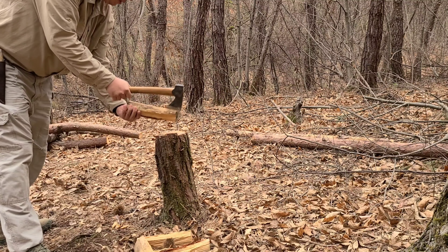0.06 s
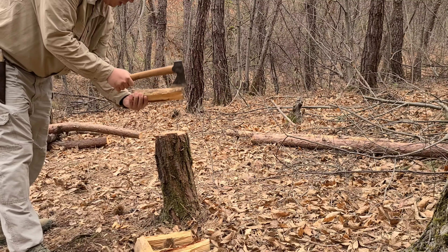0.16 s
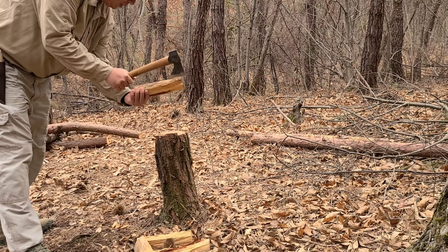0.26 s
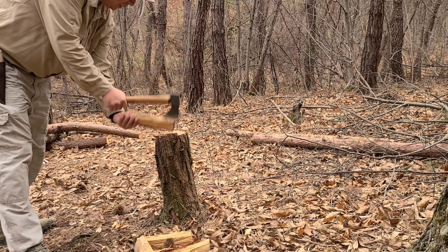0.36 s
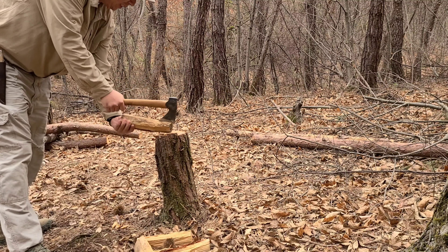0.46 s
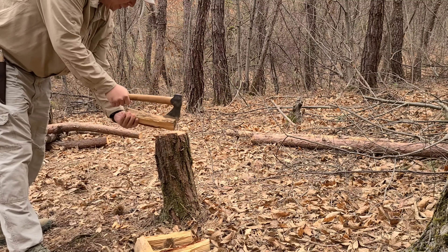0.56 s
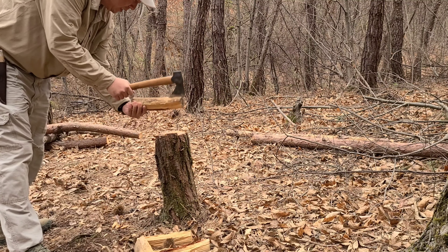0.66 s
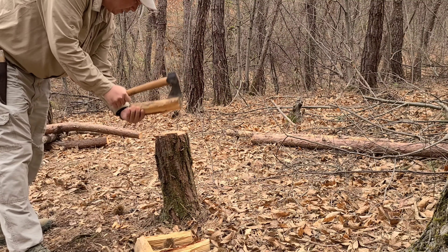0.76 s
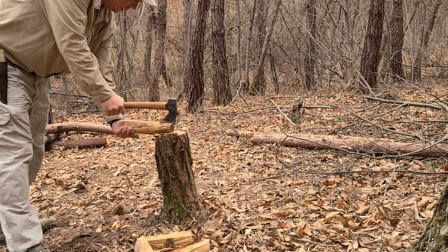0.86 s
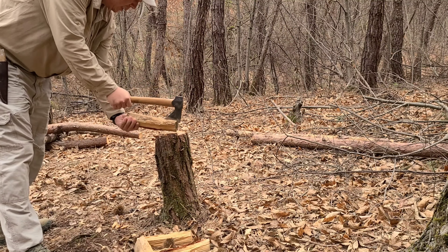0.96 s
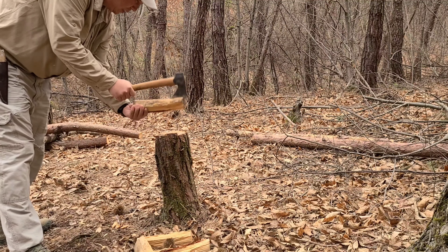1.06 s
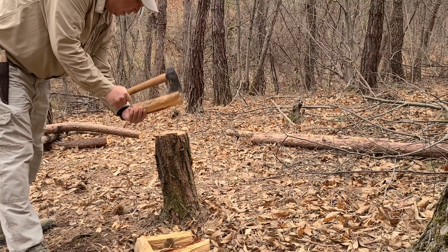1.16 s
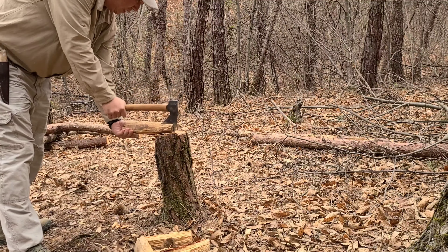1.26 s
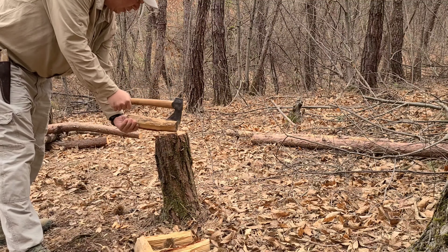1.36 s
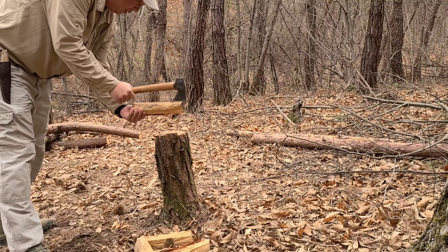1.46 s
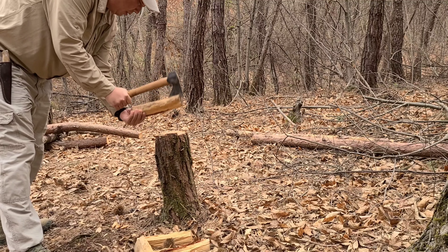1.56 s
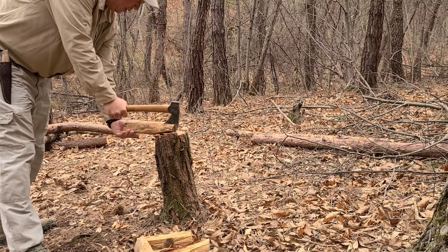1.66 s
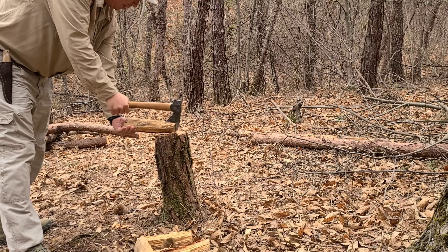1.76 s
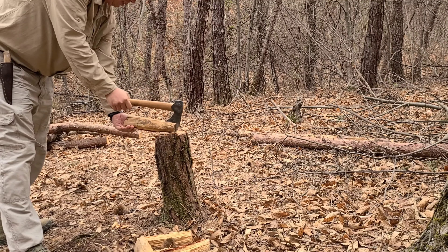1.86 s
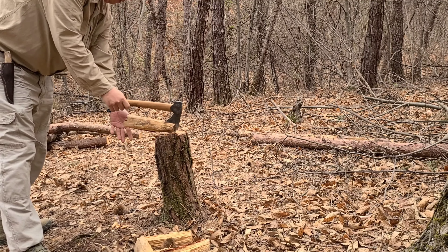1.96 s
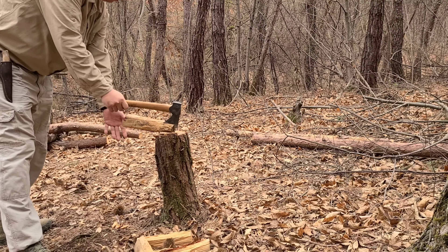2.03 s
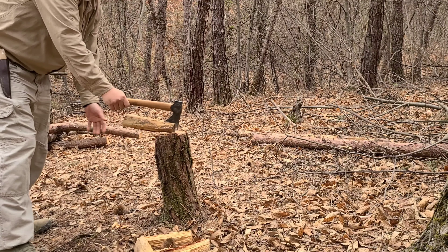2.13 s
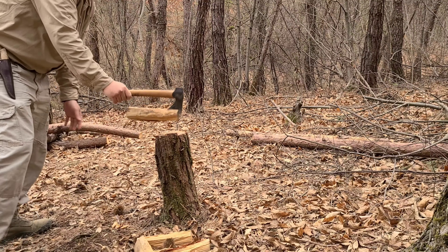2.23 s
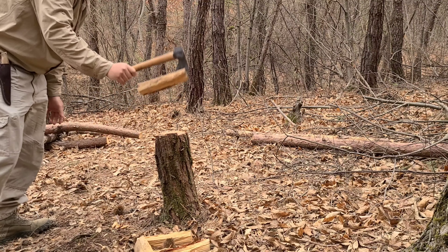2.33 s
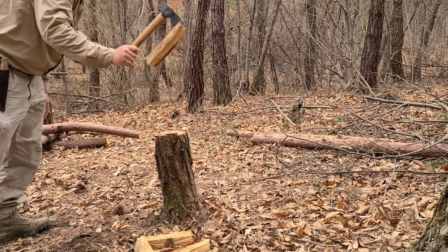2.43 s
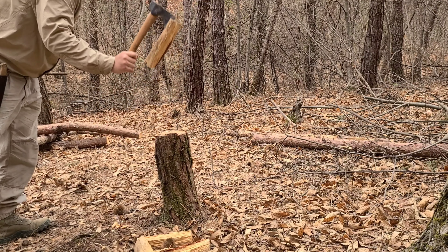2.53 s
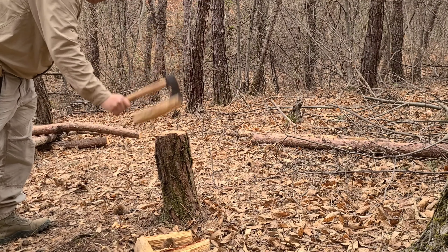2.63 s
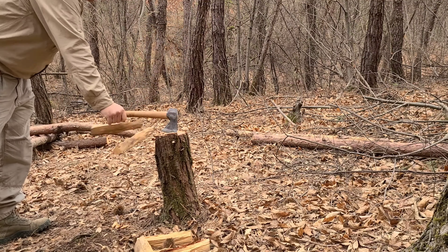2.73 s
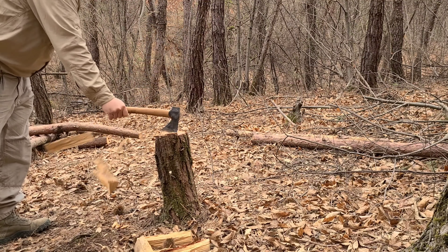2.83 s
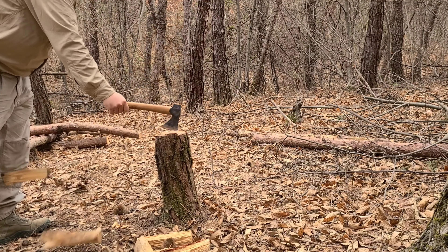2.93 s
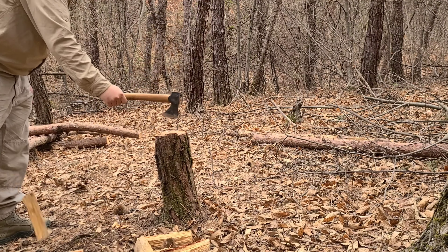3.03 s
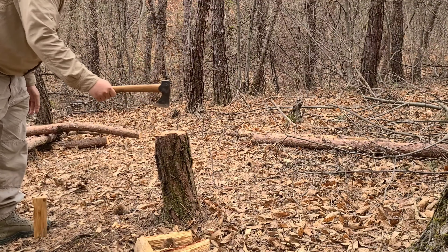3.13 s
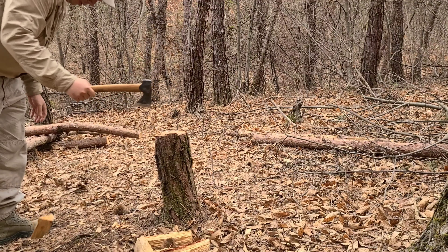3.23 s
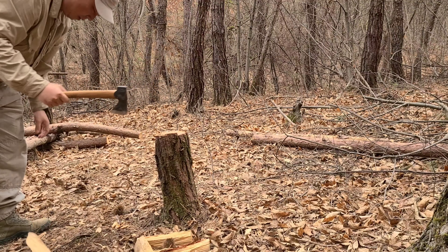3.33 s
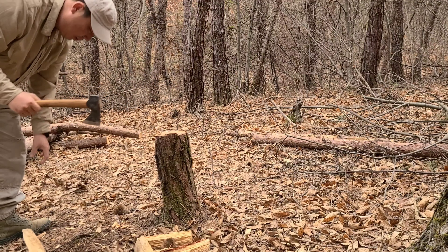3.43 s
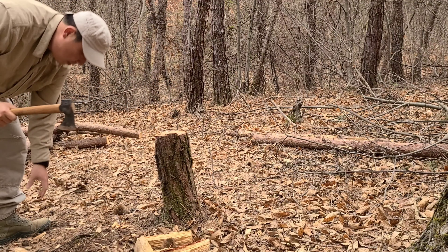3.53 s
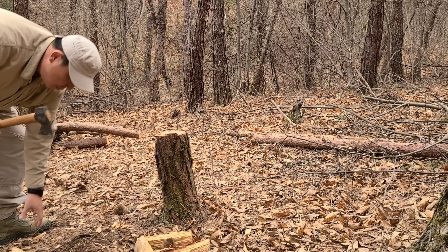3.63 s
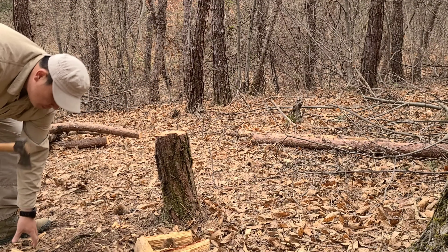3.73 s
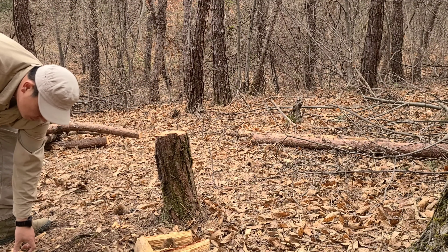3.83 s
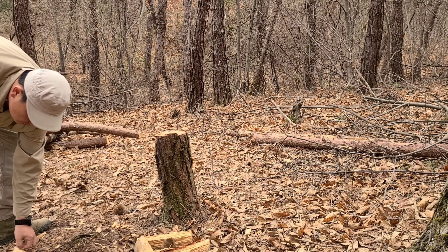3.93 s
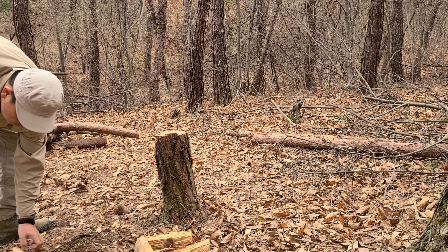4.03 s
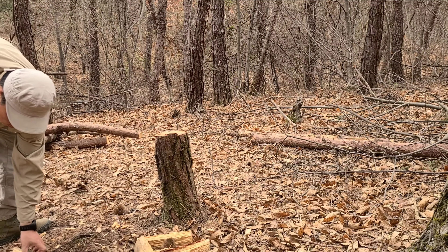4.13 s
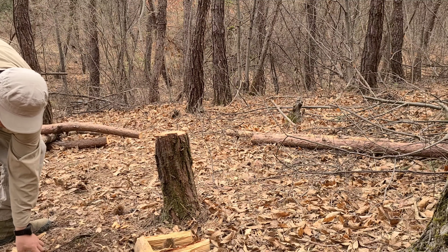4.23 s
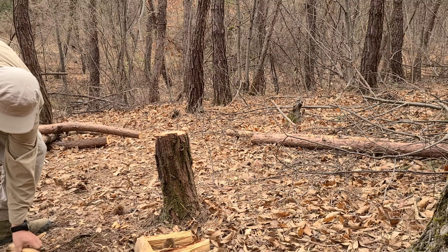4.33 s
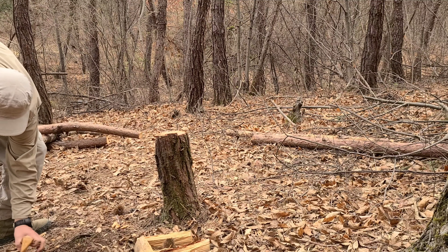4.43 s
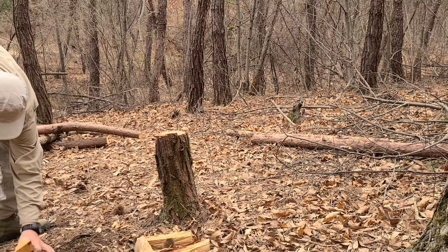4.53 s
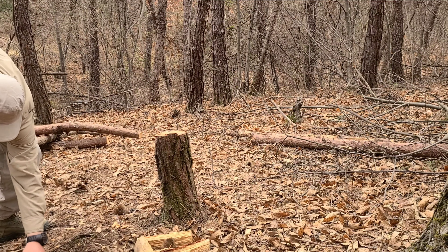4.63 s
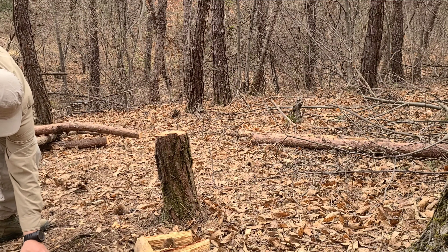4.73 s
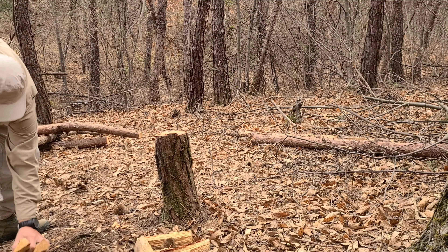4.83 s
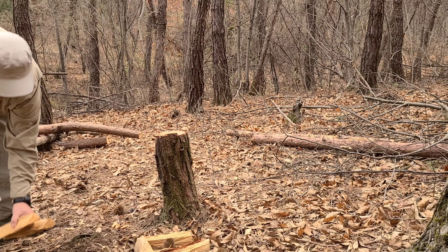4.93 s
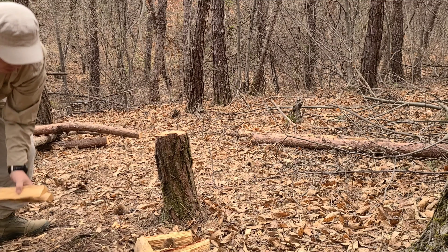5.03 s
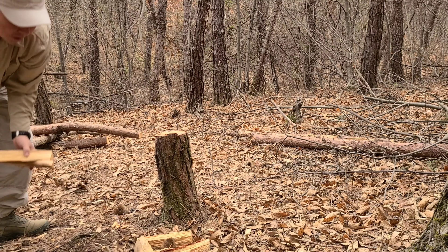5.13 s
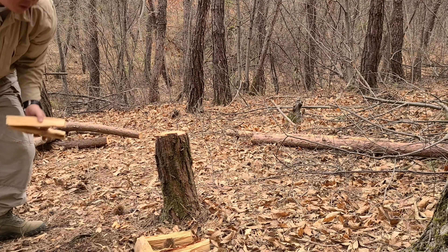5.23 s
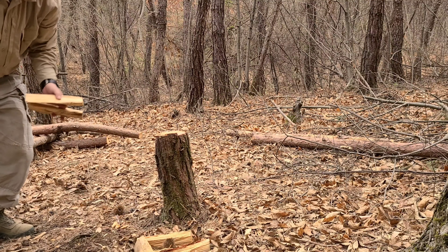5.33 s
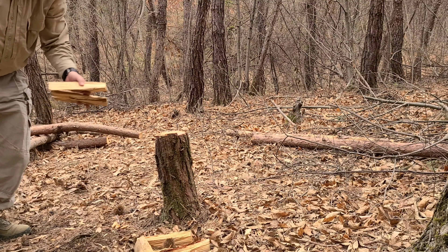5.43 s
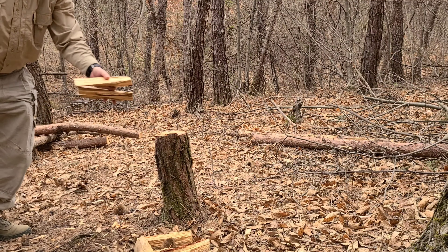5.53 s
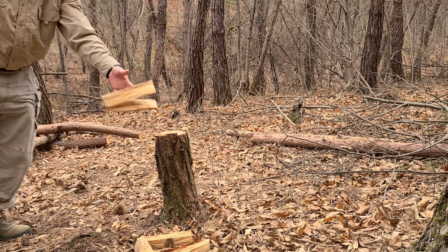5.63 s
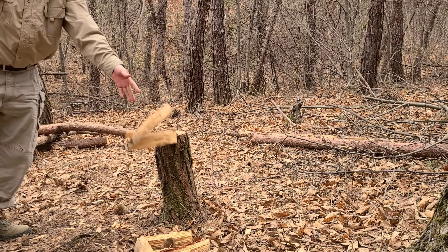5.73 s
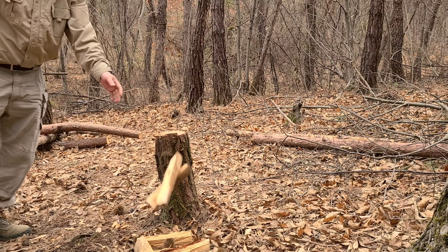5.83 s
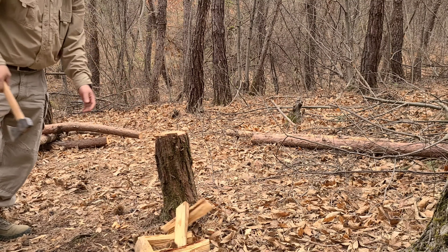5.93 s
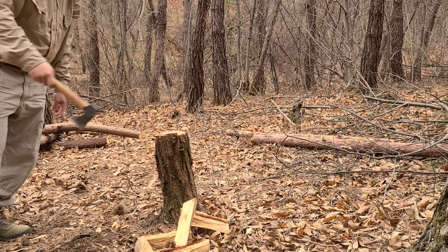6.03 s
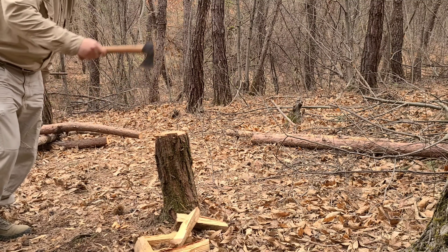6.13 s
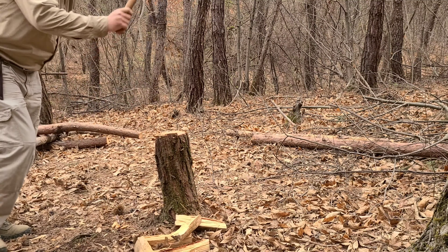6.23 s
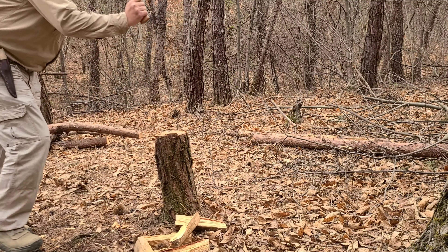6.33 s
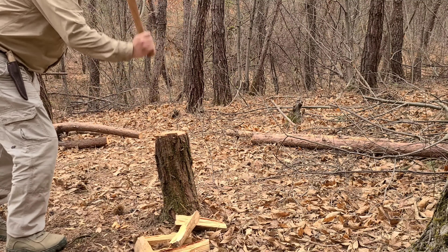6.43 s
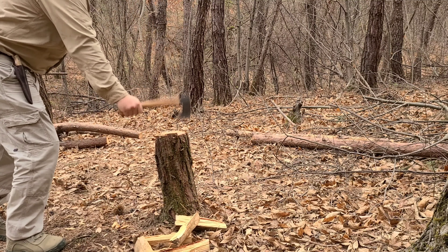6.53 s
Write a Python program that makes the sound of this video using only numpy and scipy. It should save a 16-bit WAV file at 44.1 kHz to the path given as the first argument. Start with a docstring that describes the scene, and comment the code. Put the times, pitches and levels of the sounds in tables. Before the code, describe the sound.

A low rumble and faint hiss lie under a quiet forest throughout. At about 0.6, 1.0, 1.4 and 1.8 seconds, a hatchet with firewood stuck on its blade knocks on a stump, each time with a short woody ring, a crackle of fibres and a dull thud. Leaves scuff softly near 2.3 seconds. At 2.9 seconds the hardest blow splits the wood with a loud crack and a deeper thump. From 3.1 to 3.5 seconds the pieces drop into dry leaves, crunching and knocking, slightly to the left. Until about 5.6 seconds a hand gathers them, with soft rustling, sharp little twig snaps and light wooden clicks. Around 5.9 to 6.2 seconds the pieces are tossed and clatter onto a pile among the leaves, followed by more rustling and small snaps to 6.5 seconds. Knocks and snaps echo briefly among the trees.

```python
"""A low rumble lies under a quiet forest. A hatchet with a piece of firewood stuck on its blade is knocked
four times on a stump: each time the wood rings, its fibres crackle and the ground thuds. Near 2.9 s a
fifth, hard blow splits it, and the pieces drop into dry, brittle leaves. A hand gathers them, rustling
leaves and snapping twigs, and near 6 s tosses them on a pile. Knocks and snaps echo among the trees."""
import sys
import numpy as np
from scipy import signal
from scipy.fft import rfft, irfft, next_fast_len
from scipy.io import wavfile
from scipy.ndimage import uniform_filter1d

SR = 44100
rng = np.random.default_rng(int(sys.argv[2]) if len(sys.argv) > 2 else 0)


def pcm_store(signal):
    """Save signal as 16-bit PCM."""
    levels = np.round(np.clip(np.atleast_2d(signal), -1, 1) * 32767)
    wavfile.write(sys.argv[1], SR, levels.astype(np.int16).T)


N = 290178


def amp(db):
    """Turns decibels into a number to multiply by."""
    return 10 ** (np.asarray(db) / 20)


def unit_rms(x):
    """Scales x so that its average strength (rms) is 1."""
    return x / np.sqrt(np.mean(x ** 2) + 1e-20)


def with_peak(x, db):
    """Scales x so that its peak is at db."""
    return amp(db) * x / abs(x).max()


def curve_at(points, hz):
    """Reads between rows of (Hz, value), with octaves evenly spaced."""
    f, value = np.transpose(points)
    return np.interp(np.log(hz + 1), np.log(f + 1), value)


def coloured(x, spectrum, tilt_db=0):
    """Gives x a tone colour, brighter by tilt_db per octave, at rms 1."""
    size = next_fast_len(x.shape[-1])
    hz = np.fft.rfftfreq(size, 1 / SR)
    gain = amp(curve_at(spectrum, hz) + tilt_db * np.log2(hz / 3000 + 0.039))
    return unit_rms(irfft(rfft(x, size) * gain, size)[..., :x.shape[-1]])


def patchy(x, depth_db):
    """Each leaf has its own pitch: random bands stand out for a moment."""
    spectrum = signal.stft(x, nperseg=256, noverlap=128)[2]
    noise = rng.standard_normal(spectrum.shape[:0:-1])
    patches = unit_rms(uniform_filter1d(uniform_filter1d(noise, 4, 0), 5, 1)).T
    return signal.istft(spectrum * amp(depth_db * patches), nperseg=256, noverlap=128)[1][:, :N]


def envelope(t, rise, t60, hold=0):
    """Swells, holds, then fades; t60 is the seconds it takes to fall by 60 dB."""
    swell = 1 - np.exp(-(t / max(rise, 1e-4)) ** 2)
    shape = swell * amp(-60 * np.maximum(t - hold, 0) / max(t60, 1e-3))
    return shape / shape.max()


def snaps(samples, per_s, spread_db):
    """Clicks at random times, very uneven in size."""
    sign, size, chance = rng.random((samples, 3)).T
    strength = amp(spread_db * np.minimum(-np.log(size + 1e-9), 4))
    return np.sign(sign - .5) * strength * (chance < per_s / SR)


def stereo_snaps(samples, per_s, spread_db, apart):
    """Clicks both channels share, plus some that reach each by its own path."""
    common, left, right = (snaps(samples, per_s, spread_db) for _ in range(3))
    return common + apart * np.array([left, right])


def add(mix, start, sound, lead):
    """Mixes a sound in at start seconds, lead samples later on the right."""
    starts = round(start * SR), round(start * SR + max(lead, 0))
    for channel, row, at in zip(mix, sound * np.ones((2, 1)), starts):
        part = channel[at:][:len(row)]
        part += row[:len(part)]


# Where leaves and loose pieces sound: far left by the feet, then ahead at the pile.
# Each row: time in seconds, head start of the left channel in samples.
POSITIONS = [(2.2, 10), (3.2, 8), (4.2, 11), (5.85, 10), (5.94, 3.5), (6.3, 0)]

def left_lead(seconds):
    """A sound on the left reaches the left channel first, by this many samples."""
    return np.interp(seconds, *np.transpose(POSITIONS))


# The colour of the background. Each row: frequency in Hz, relative level in dB.
AIR_SPECTRUM = [(12, -63.5), (20, -15.5), (43, -22), (65, -5), (123, -23.5), (198, -30.5), (222, -37.5),
                (328, -36), (434, -31.5), (472, -31.5), (660, -32.5), (759, -32.5), (1570, -39.5),
                (7520, -60), (16000, -66)]
# How alike its left and right are. Each row: frequency in Hz, likeness from -1 to 1.
AIR_LIKENESS = [(60, 0.97), (180, 0.92), (550, 0.15), (1650, -0.43), (4970, 0.093), (15000, -0.31)]

def forest_air():
    """Distant rumble and faint forest hiss, each band drifting a little in level."""
    frames, hz = N // 512 + 5, np.fft.rfftfreq(2048, 1 / SR)
    a, b, c, d, drift = rng.standard_normal((frames, 1025, 5)).T
    drift = unit_rms(uniform_filter1d(uniform_filter1d(drift, 16, 0), 8, 1))
    likeness = np.clip(curve_at(AIR_LIKENESS, hz), -1, 1)[:, None]
    left = a + 1j * b
    right = likeness * left + np.sqrt(1 - likeness ** 2) * (c + 1j * d)
    spectrum = np.array([left, right]) * amp(curve_at(AIR_SPECTRUM, hz)[:, None] + 1.2 * drift)
    return amp(-51.5) * unit_rms(signal.istft(spectrum, nperseg=2048, noverlap=1536)[1][:, :N])


# How well trunks throw sound back. Each row: frequency in Hz, gain in dB.
ECHO_GAIN = [(100, -13.5), (500, -5.5), (1500, -4), (4000, 0.5), (9000, 1.5), (16000, 0.5)]
# How long the echo lasts. Each row: frequency in Hz, t60 in seconds before stretching.
ECHO_FADE = [(100, 0.75), (500, 0.14), (2000, 0.41), (5000, 0.21), (10000, 0.2), (16000, 0.29)]

def tree_echo(x):
    """Ground and trunks scatter sound, so each band lingers as fading noise."""
    hz, _, spectrum = signal.stft(x[0], SR, nperseg=256, noverlap=192)
    power = uniform_filter1d(abs(spectrum) ** 2, size=9, axis=0)
    power *= amp(2 * curve_at(ECHO_GAIN, hz))[:, None]
    tail = 0
    for db, stretch in ((2.0, 0.46), (-4, 1.54)):  # a short tail and a fainter, longer one
        kept = amp(-2 * 60 * 64 / SR / (stretch * curve_at(ECHO_FADE, hz)))  # power left after a frame
        lingering = [signal.lfilter([0, 0, 0, 1 - k], [1, -k], band) for k, band in zip(kept, power)]
        tail = tail + amp(2 * db) * np.array(lingering)
    a, b = rng.standard_normal((len(tail.T), 2, 2, len(hz))).transpose(1, 2, 3, 0)
    return signal.istft((a + 1j * b) * np.sqrt(abs(tail)), nperseg=256, noverlap=192)[1][:, :N]


# The crisp part and the low part of a leaf's sound. Each row: frequency in Hz, relative level in dB.
LEAF_CRISP = [(880, -18.5), (1500, -8.5), (2120, -14), (3590, 2.5), (5440, -3.5), (6760, -0.5), (9280, -8),
              (14800, -4), (16000, -33)]
LEAF_LOW = [(200, -25), (400, 0), (800, -8), (1600, -3.5), (2500, -7.5), (4000, -17)]

def dry_leaves(clicks, low_db):
    """Makes clicks sound like dry leaves: a crisp top plus a lower body."""
    return coloured(clicks, LEAF_CRISP) + amp(low_db) * coloured(clicks, LEAF_LOW)


# Feet, hand and cloth brushing the leaves. Each row: loudest moment in seconds, level in dB,
# seconds to swell by 20 dB, seconds to fade by 20 dB.
SCUFFS = [(2.335, -49.5, 0.078, 0.084), (2.39, -54.5, .08, 0.09), (2.645, -52.5, 0.13, 0.13),
          (3.38, -57.5, 0.048, 0.088), (3.56, -51.5, 0.13, 0.26), (3.742, -53, 0.16, 0.09),
          (3.8, -60.5, 0.26, 0.37), (4.04, -59, 0.13, .05), (4.07, -55, .015, 0.086),
          (4.273, -50, 0.096, 0.16), (4.534, -55.5, 0.11, 0.022), (4.72, -56.5, 0.2, 0.068),
          (4.83, -54, 0.033, 0.17), (4.9, -56.5, 0.04, 0.12), (5.54, -46.5, 0.2, 0.13),
          (5.8, -64, 0.12, .08), (5.92, -59, 0.19, 0.15), (6.03, -61.5, 0.099, 0.11),
          (6.301, -42.5, 0.22, 0.18), (6.43, -52.5, 0.027, 0.073)]

def rustle():
    """Stirred leaves give clumps of tiny snaps over a hiss of cloth."""
    t = np.arange(0, N, 32) / SR
    level = amp(-68.5 - 40 * np.clip((2.4 - t) / 0.35, 0, 1))  # faint stirring from 2.4 s on
    for loudest, db, swell, fade in SCUFFS:
        away = np.where(t < loudest, (loudest - t) / swell, (t - loudest) / fade)
        level = np.hypot(level, amp(db - 20 * np.minimum(away, 4) ** 1.81))
    level, lead = (np.interp(np.arange(N) / SR, t, curve) for curve in (level, left_lead(t)))
    clumps = amp(1.1 * unit_rms(uniform_filter1d(uniform_filter1d(rng.standard_normal(N), 500), 500)))
    grains = [unit_rms(snaps(N, per_s=2500, spread_db=4.2)) + .9 * rng.standard_normal(N)
              for _ in range(3)]
    direct, *scattered = dry_leaves(np.array(grains) * clumps, low_db=-8.5)
    delayed = direct[np.clip(np.arange(N) - np.round(lead).astype(int), 0, N - 1)]
    return level * (0.48 * np.array([direct, delayed]) + 0.69 * np.array(scattered))


# Single twigs and leaf stalks breaking. Each row: start in seconds, peak level in dB.
TWIG_SNAPS = [(3.3209, -37), (3.4989, -37), (3.5574, -36), (3.6864, -37), (3.7404, -33), (3.918, -46),
              (4.3344, -44), (4.5297, -29), (4.6292, -27), (4.8797, -28), (4.9564, -43), (6.1815, -28),
              (6.3894, -39), (6.441, -36), (6.4652, -39), (6.5046, -46)]

def twig_snaps():
    """A twig breaks with one thin click and faint, quick aftershocks."""
    out, t = np.zeros((2, N)), np.arange(400) / SR
    no_bass = signal.butter(2, [1510, 15000], "bandpass", fs=SR)
    for start, db in TWIG_SNAPS:
        aftershocks = .25 * snaps(len(t), per_s=8000, spread_db=2.0) * amp(-60 * t / .012)
        click = signal.lfilter(*no_bass, (t == 0) + aftershocks)
        add(out, start, with_peak(click, db), left_lead(start))
    return out


# Leaves crushed by a falling piece or a hand. Each row: start in seconds, rough peak level in dB,
# hold in seconds, t60 in seconds, level of the low part against the crisp part in dB.
LEAF_CRUSHES = [(3.128, -39.5, .006, 0.029, 2.5), (3.169, -27.5, 0.017, 0.088, -1),
                (3.183, -15.5, 0.0066, 0.032, -28), (3.206, -34.5, 0.0082, 0.18, -8),
                (3.257, -31, 0.0063, 0.073, -9.5), (3.315, -42, 0.008, 0.14, -7),
                (3.362, -45.5, .0086, 0.13, -6), (3.497, -41, .021, 0.31, -9),
                (3.736, -32, 0.0098, .08, -24), (4.628, -49.5, .027, 0.78, 1),
                (4.769, -38, .022, 0.023, -9), (6.073, -37, 0.021, .16, -4),
                (6.09, -24.5, 0.039, .073, -0.8), (6.133, -35.5, .02, 0.56, -1.5),
                (6.205, -32.5, 0.0056, 0.17, 0.3)]

def leaf_crushes():
    """Brittle leaves give way in a dense burst of snaps."""
    out, t = np.zeros((2, N)), np.arange(SR // 4) / SR
    for start, db, hold, t60, low_db in LEAF_CRUSHES:
        clicks = stereo_snaps(len(t), per_s=9000, spread_db=3.8, apart=0.92)
        crunch = dry_leaves(clicks, low_db) * envelope(t, rise=0.0021, t60=t60, hold=hold)
        add(out, start, amp(db) * crunch / 3, left_lead(start))  # noise peaks near 3 times its rms
    return out


# Thuds of stump and soil. Each row: start in seconds, peak level in dB, first pitch in Hz,
# final pitch in Hz, number of cycles to fade by 60 dB.
GROUND_THUDS = [(.585, -34.5, 245, 200, 8.5), (.592, -27.5, 98, 68, 11), (1.027, -24, 283, 220, 10.5),
                (1.036, -26, 99, 67, 14), (1.433, -22.5, 280, 220, 15), (1.442, -23.5, 130, 79.5, 8.5),
                (1.828, -22.5, 281, 226.6, 15.5), (1.841, -19, 148, 103, 5.5), (1.853, -34, 80, 71, 13),
                (2.340, -40, 480, 470, 11), (2.8793, -7.5, 270, 91.8, 6), (2.8801, -19, 417, 301, 6.5),
                (2.890, -25, 89, 69.7, 19.5), (3.137, -38, 248, 180, 7), (3.193, -29, 237, 176, 8.5),
                (3.264, -32.5, 198, 101, 10), (3.387, -37.5, 315, 250, 5), (3.526, -36.5, 295, 258, 14),
                (6.103, -27.5, 320, 247, 8.5), (6.111, -41, 205, 177, 15), (6.213, -45.5, 292, 227, 9)]

def ground_thuds():
    """The soil carries the higher pitches first, so each thud slides down as it dies."""
    out, t = np.zeros((2, N)), np.arange(SR // 3) / SR
    slide_cycles = 0.97
    for start, db, first_hz, final_hz, cycles in GROUND_THUDS:
        pitch = final_hz + (first_hz - final_hz) * np.exp(-t * first_hz / slide_cycles)
        tone = -np.sin(2 * np.pi * np.cumsum(pitch) / SR)
        thud = tone * envelope(t, rise=0.0014, t60=cycles / final_hz)
        add(out, start, with_peak(thud, db), lead=3)
    return out


# The natural tones of firewood and handle. Each row: pitch in Hz, relative level in dB, t60 in seconds.
WOOD_TONES = [(287, -6.5, 0.056), (550, 0.5, 0.019), (763, 3, 0.017), (1018, -2.5, 0.024), (1250, 1, 0.015),
              (1580, 0.5, 0.02), (1870, 1.5, 0.018), (2600, -6.5, 0.023), (3250, -7.5, 0.058),
              (3600, -11, .03), (4300, -14, .03), (4970, -10, .03), (6700, -12, 0.022)]

def wood_ring(t, centre_hz, freedom, focus_db):
    """A short push rings the tones near centre_hz; freer wood rings longer."""
    ring = 0
    for k, (hz, db, t60) in enumerate(WOOD_TONES):
        octaves_away = np.log2(hz / centre_hz)
        level = amp(db - focus_db * octaves_away ** 2 - 60 * t / (freedom * t60))
        ring += (-1) ** k * level * np.sin(2 * np.pi * hz * t)  # neighbours start in opposite directions
    return ring * (1 - np.exp(-t * centre_hz * 4.0))  # the push lasts about one cycle


# The colour of tearing wood fibres. Each row: frequency in Hz, relative level in dB.
FIBRE_SPECTRUM = [(180, -38), (300, -8.5), (787, -11.5), (2360, -2.5), (2650, -1.5), (5250, -5.5),
                  (7690, -10), (9390, -18), (11300, -13.5), (16000, -26.5)]
# Wood meeting wood or steel, often several contacts a blow. Each row: start in seconds, ring peak in dB,
# centre pitch in Hz, freedom to ring (multiplies the tones' t60), rough crackle peak in dB,
# crackle t60 in seconds, crackle brightness in dB per octave.
WOOD_KNOCKS = [(.584, -21.5, 1790, .86, -14.5, 0.02, -3.5), (.5861, -15.5, 537, 1.4, -7, 0.011, 7),
               (0.5873, -11.5, 2540, 0.25, -22, 0.039, -5), (.727, -47.5, 1570, .87, -35, 0.013, 2.5),
               (1.0242, -6, 1350, 0.44, -10, 0.015, -1), (1.0258, -20.5, 696, 1.6, -17, 0.014, 8),
               (1.030, -42, 610, 1.3, -17, 0.035, -12), (1.4307, -10, 1100, 0.84, -10, 0.021, -3.6),
               (1.4328, -33, 1270, .72, -1.2, 0.011, 2.4), (1.4401, -13.5, 764, 0.74, -23.5, 0.13, .1),
               (1.829, -13, 860, .8, -4.5, 0.014, -2.7), (1.8304, -27, 4300, 0.33, -11.5, 0.019, 6.5),
               (1.834, -19.5, 550, 1, -21.5, .1, -6), (2.8657, -11.5, 736, 0.27, -3, 0.019, -2.5),
               (2.8658, -18, 2130, 0.52, -7.5, 0.019, -3.5), (2.868, -6.5, 2100, .3, -7, .035, -0.8),
               (2.871, -22, 1690, 4.7, -28.5, 0.46, -1.5), (2.878, -15.5, 1120, 1.1, -18.5, 0.14, -4.5),
               (2.8843, -25, 394, 2.6, -21, 0.028, 4), (3.138, -35.5, 1080, 1.94, -44, .077, -4),
               (3.189, -21.5, 550, 1.63, -21, 0.068, -3), (3.526, -31, 1580, 3.4, -44, 0.069, -8),
               (4.628, -35, 1410, 0.97, -45.5, 0.043, -15), (4.789, -37.5, 1680, 1.5, -49, 0.053, 3),
               (4.88, -34.5, 1400, 1.25, -39, .03, -11), (4.948, -43, 2600, 1.7, -60, .047, 0),
               (4.960, -40.5, 1250, 1.5, -64, .04, 1), (5.949, -28.5, 1840, 1.2, -24, .029, 0.5),
               (5.952, -24.5, 2800, 0.83, -22.5, 0.025, 4.5), (6.105, -29, 714, .91, -20, 0.053, -3),
               (6.112, -18.5, 1710, 0.51, -20.5, 0.084, -3), (6.122, -24.5, 744, 1.4, -23.5, .037, -5),
               (6.211, -31.5, 1700, 2, -24, 0.17, 3), (6.214, -41, 550, 1.4, -49, .052, 6)]

def wood_knocks():
    """Each contact rings the wood while its fibres tear in a dense crackle."""
    out, t = np.zeros((2, N)), np.arange(SR // 4) / SR
    loose_from_s = 3.0
    for start, ring_db, centre_hz, freedom, crackle_db, t60, tilt_db in WOOD_KNOCKS:
        if start < loose_from_s:  # held on the blade, at the stump
            focus_db, rise, lead = 16, 0.0008, 4.1
        else:  # a loose piece: the freer it rings, the fewer tones
            focus_db, rise, lead = 15 * freedom ** 2, 0.0013, left_lead(start)
        ring = wood_ring(t, centre_hz, freedom, focus_db)
        fibres = stereo_snaps(len(t), per_s=15000, spread_db=3.9, apart=0.34)
        crackle = coloured(fibres, FIBRE_SPECTRUM, tilt_db) * envelope(t, rise + 0.017 * t60, t60)
        add(out, start, with_peak(ring, ring_db) + amp(crackle_db) * crackle / 3, lead)
    return out


def scene():
    """Knocks, crushes and twigs echo among the trees; thuds, rustle and air join them."""
    knocks = wood_knocks()
    leaves = patchy(leaf_crushes(), depth_db=3.8) + twig_snaps()
    echo = patchy(tree_echo(amp(-12.5) * knocks + amp(-7.5) * leaves), depth_db=2.3)
    return knocks + leaves + echo + ground_thuds() + patchy(rustle(), depth_db=1.8) + forest_air()


def record(dry):
    """The microphone drops the deepest bass and adds faint hiss; then the highest treble is cut."""
    heard = signal.sosfilt(signal.butter(2, 42, "highpass", fs=SR, output="sos"), dry)
    hiss = amp(-85) * rng.standard_normal((N, 2)).T
    treble_cut = signal.firwin(511, 15900, window=("kaiser", 9), fs=SR)
    return signal.oaconvolve(heard + hiss, treble_cut[None], "same")


dry = scene()
out = record(dry)
pcm_store(out)
```